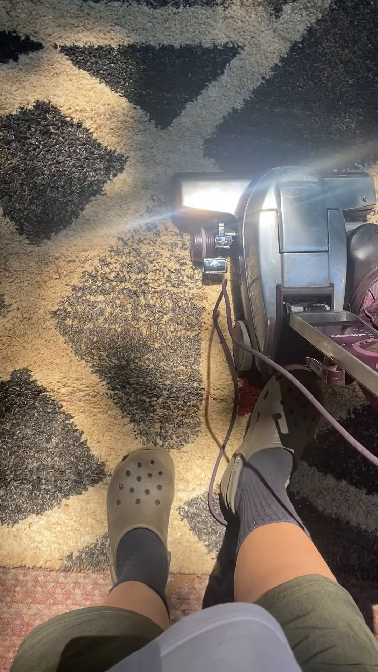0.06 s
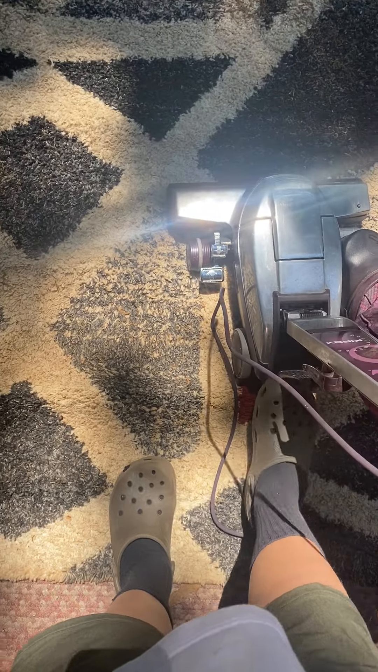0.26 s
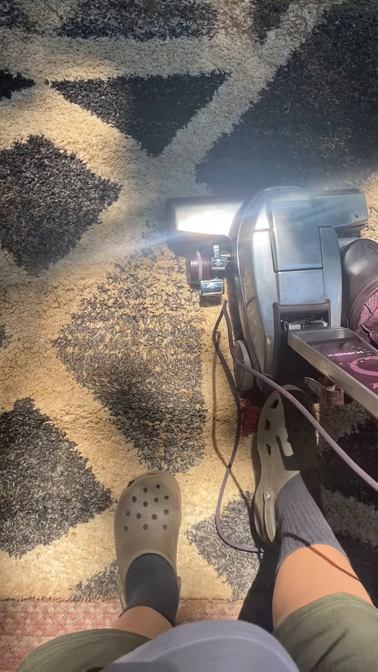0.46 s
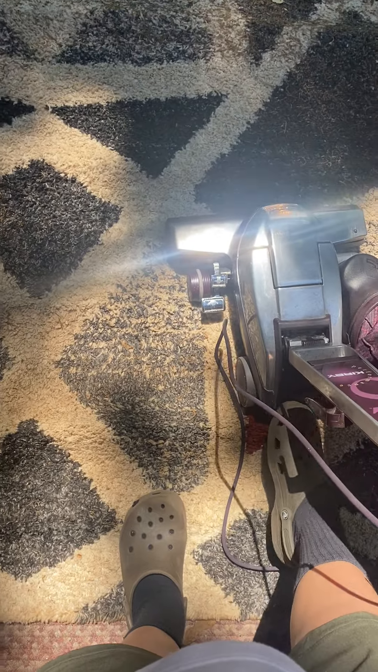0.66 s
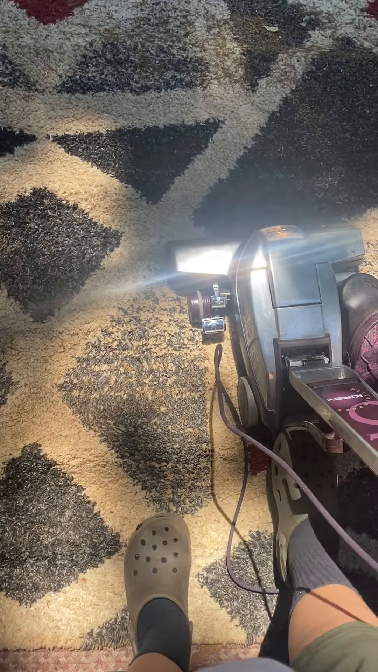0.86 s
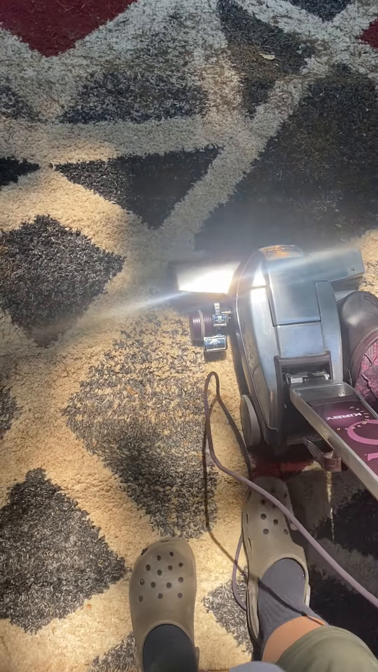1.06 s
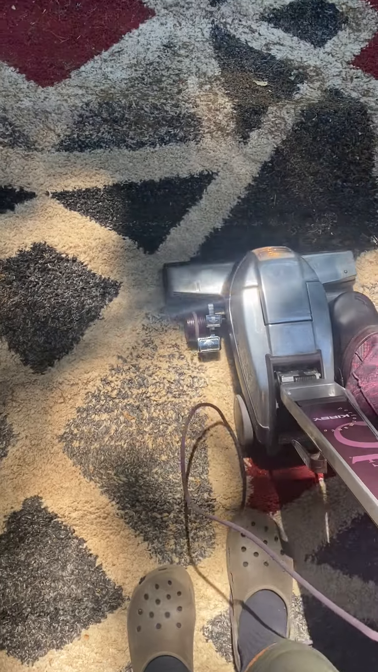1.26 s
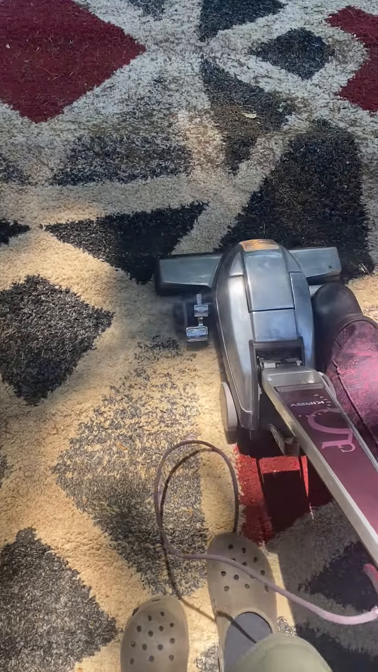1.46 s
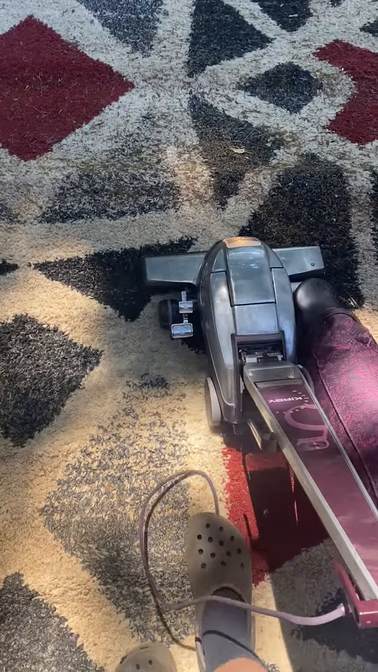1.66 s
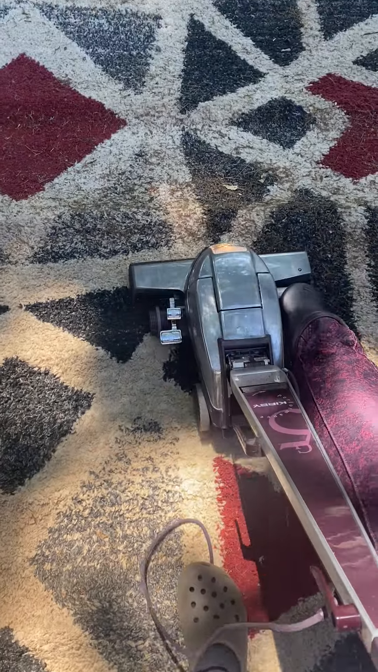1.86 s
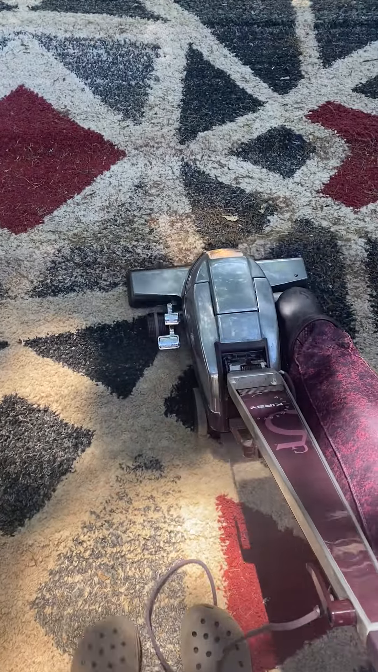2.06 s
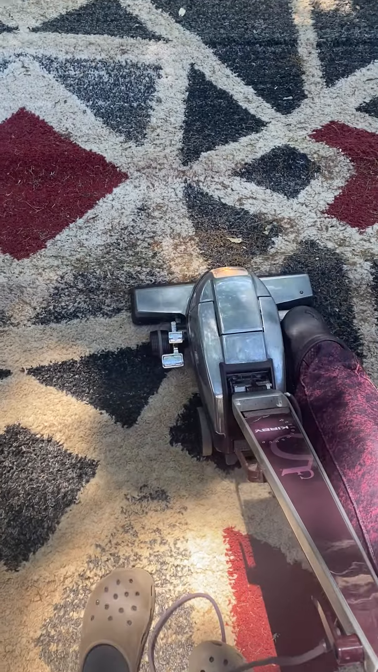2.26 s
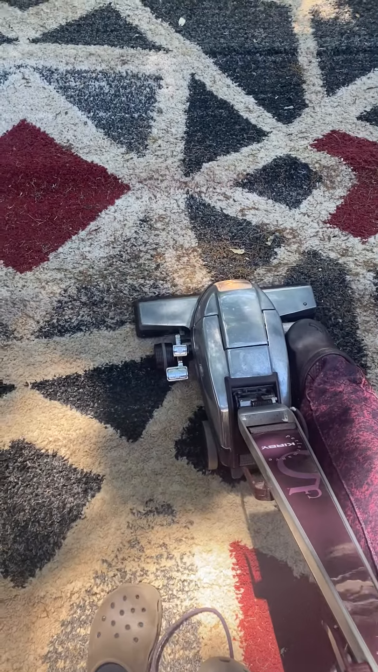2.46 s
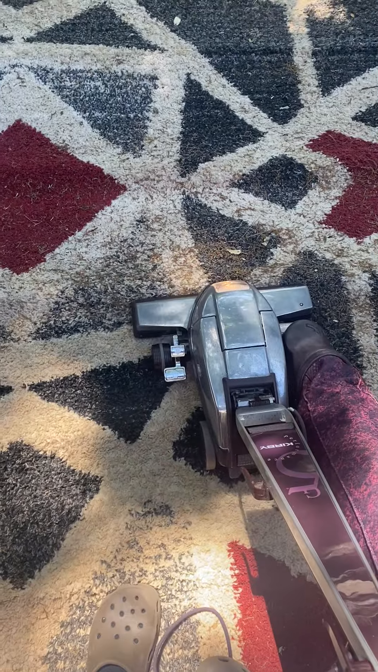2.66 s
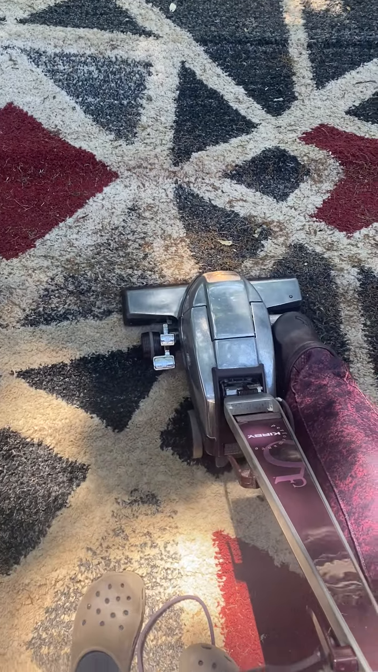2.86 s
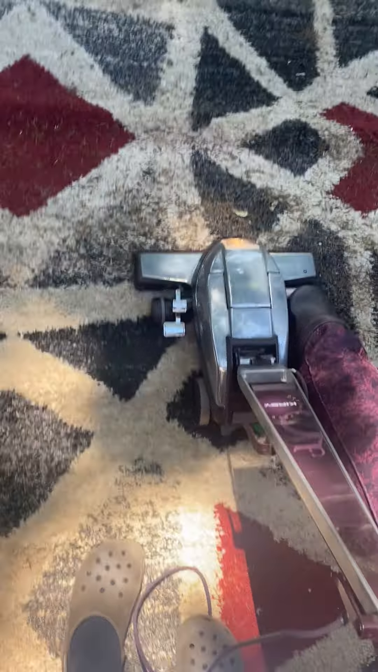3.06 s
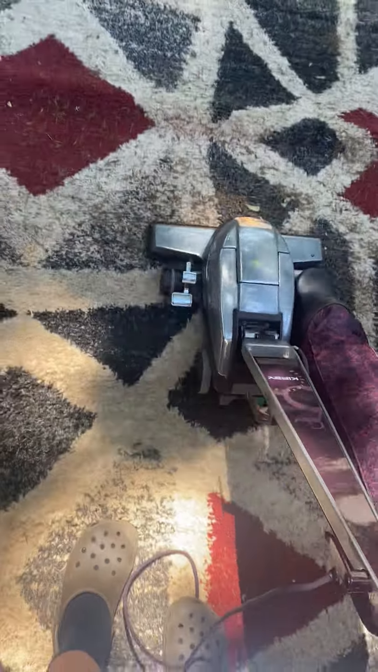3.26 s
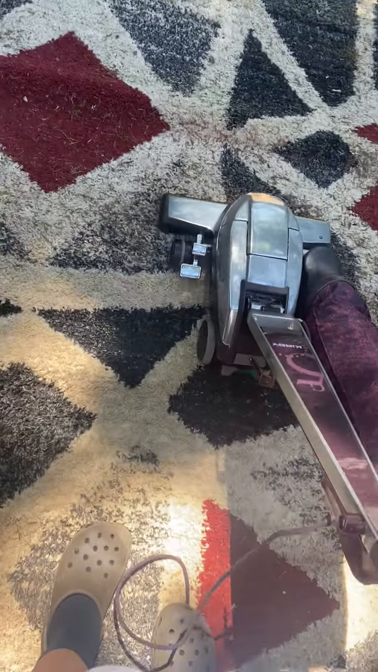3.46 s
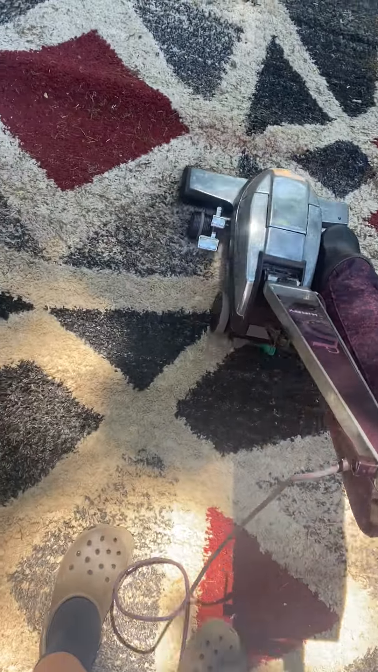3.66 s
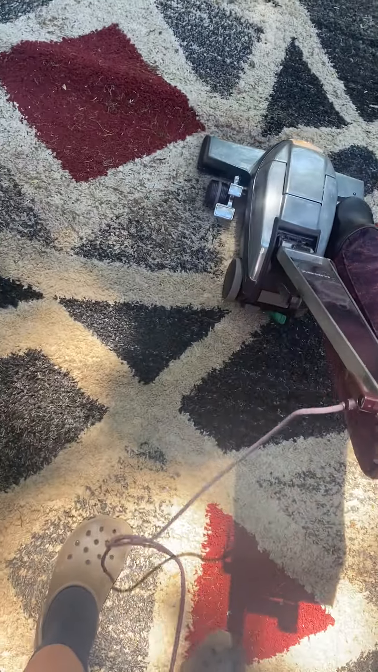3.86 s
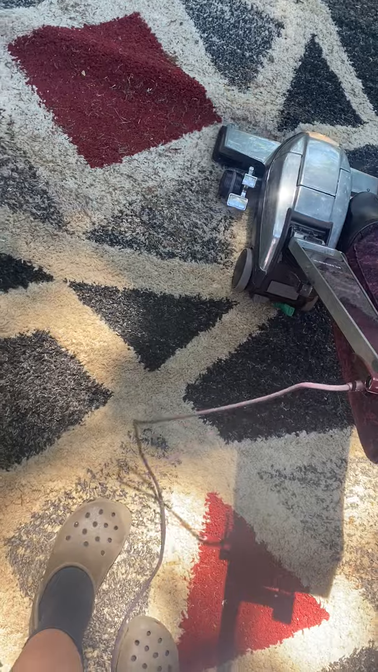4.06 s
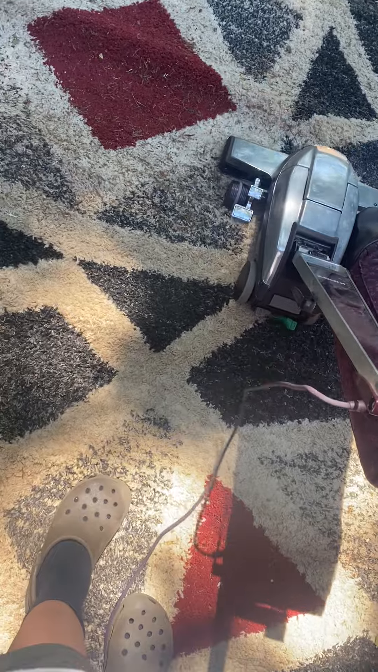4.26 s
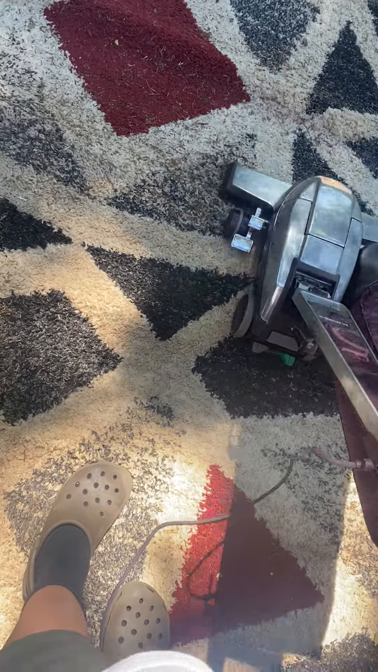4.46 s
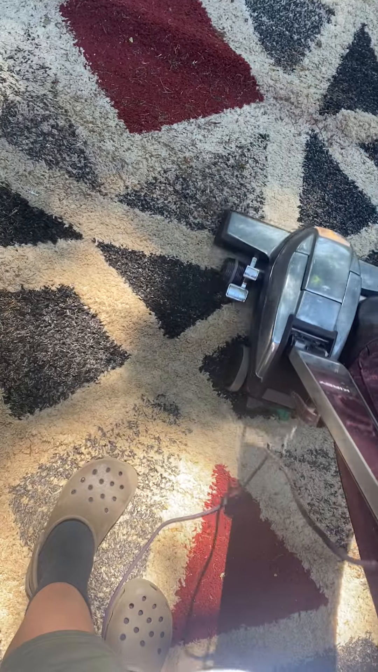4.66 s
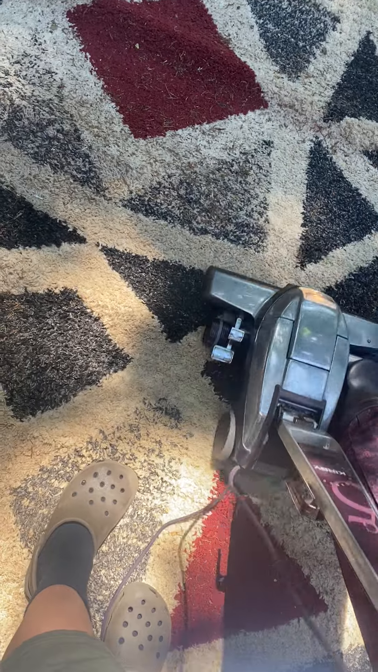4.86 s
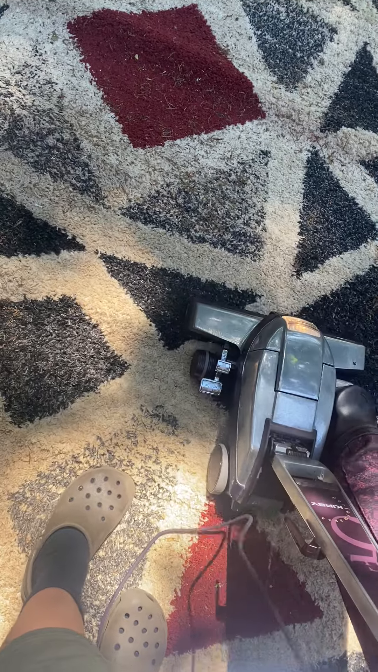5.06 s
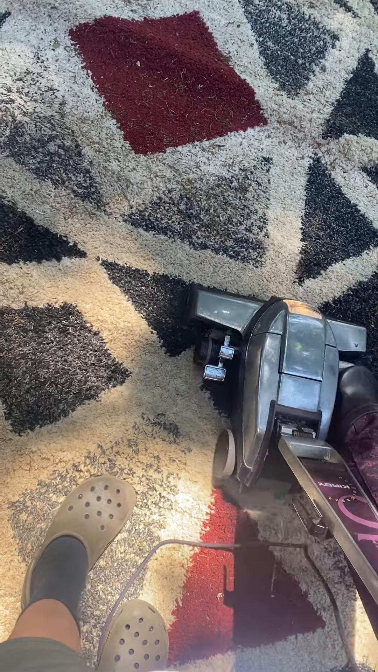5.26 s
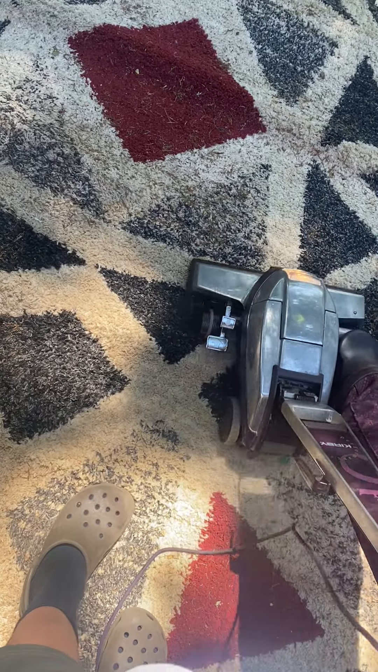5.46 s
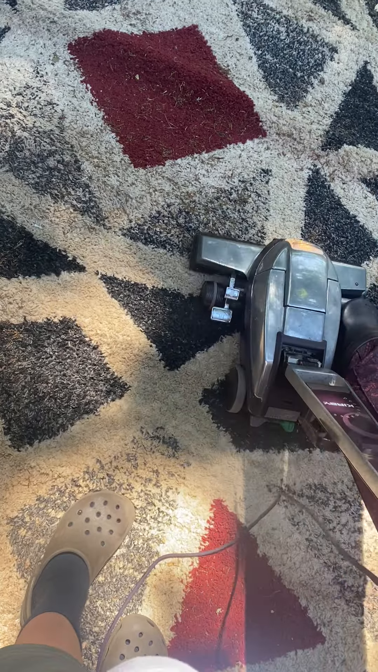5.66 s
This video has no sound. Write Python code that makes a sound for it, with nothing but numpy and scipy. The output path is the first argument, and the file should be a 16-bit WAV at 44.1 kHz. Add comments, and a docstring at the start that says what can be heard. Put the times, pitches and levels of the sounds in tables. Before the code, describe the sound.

Faint, low open air lies under the start. From about 0.1 s a foot works a plastic pedal: a few small dry clacks, then a sharper, ringing one near 0.4 s and the loudest switch snap at 0.55 s. The motor catches at once, growling and sweeping up in pitch until about 1.2 s, then runs with a high fan whine, broad airy roar and hiss, and a low buzzing brush hum near 200 Hz. Grit ticks appear from 1.5 s; bristles scratch faintly around 2 to 2.6 s. A short breathy whistle flickers near 2.9 to 3.2 s. Thuds and sharp clicks cluster at 3.3 to 3.5 s. Suction gulps dip throatily from 3.0 s, most densely at 4.4 to 4.75 s, as the motor sags slightly; a bump lands at 4.7 s. The hiss brightens around 4 to 4.8 s, then dulls. It is still running when it ends at about 5.7 s. Close, dry stereo from above.

```python
"""A foot clacks the pedal and switch of an upright vacuum cleaner on a rug in the open air; the motor spins up and runs.
Clacks are decaying noise with housing modes; the fan whines in tones locked to its shaft, over coloured air noise.
The belt-driven brush roll hums in orders of its turning and slows as it bites the pile.
The nozzle bumps and gulps, and grit ticks up it in short bursts, over the faint air of the yard.
Heard from above by a pair of closely spaced microphone ports."""
import sys
import numpy as np
from scipy import signal
from scipy.fft import rfft, irfft
from scipy.io import wavfile

SR = 44100
rng = np.random.default_rng(int(sys.argv[2]) if len(sys.argv) > 2 else 0)


def digitize_waveform(pressure):
    """Quantize a signal to 16-bit integers and store it at the path in sys.argv[1].

    Rows of a 2-D input are taken as channels; values are limited to [-1, 1].
    """
    field = np.atleast_2d(pressure).T
    bounded = np.clip(field, -1, 1)
    quanta = np.round(bounded * 32767).astype(np.int16)
    wavfile.write(sys.argv[1], SR, quanta)


N = 251811
T = np.arange(N) / SR  # s
HZ = np.fft.rfftfreq(N, 1 / SR)

# Air of the yard. Each row: frequency in Hz, relative density in dB per Hz.
YARD_SPECTRUM = [(20, -18), (55, 1.5), (120, 3), (200, -8), (500, -15.5), (1200, -23.5), (3000, -27.5),
                 (6000, -40), (15000, -52)]
YARD_SWAY_DB = .8

# The port pair, by frequency. Each row: frequency in Hz, phase by which the left leads in radians.
PORT_LEAD = [(90, 0), (400, -.18), (780, -.4), (1100, 0), (1900, 0), (2500, .55), (4300, .75), (5100, .15),
             (6000, 1.4), (7300, 3.14), (9500, 5.5), (9900, 6.2), (11000, 6.5), (13500, 9.4), (14400, 9.7),
             (15900, 12.3)]
# Each row: frequency in Hz, left minus right in dB.
PORT_TILT = [(110, 0), (200, -1), (380, -2), (620, -3.2), (1100, -1), (2300, -2.5), (4400, -1.3), (8000, 0)]
# Each row: frequency in Hz, likeness of the two ports (1 is identical, no unit).
PORT_LIKENESS = [(60, 1), (250, .998), (600, .98), (1700, .98), (3100, .85), (4200, .92), (6000, .88),
                 (7300, .97), (8500, .86), (10300, .96), (12000, .78), (13700, .97), (15000, .7)]
EDGE_HZ = 15850  # upper band limit of the recorder

# Pedal and switch. Each row: start in seconds, level before its envelope in dB, treble against middle in dB,
# decay by 60 dB in seconds, ring of the housing against the clack in dB, tilt of that ring in dB per octave.
CLACKS = [(.0805, -47, -15, .02, -2, -6), (.1008, -41, -3, .02, 0, 0), (.1028, -37, 0, .045, 3, -2),
          (.1318, -39.5, -8, .03, 0, -2), (.354, -51, -10, .045, -6, -3), (.381, -47, -10, .08, -4, 0),
          (.3989, -30, 9, .016, 12.5, 0), (.4303, -40, -3, .018, 0, 0), (.5486, -23, 2, .02, 0, -1),
          (.5537, -28, -4, .025, 1, -4)]
CLACK_RISE_S = .0006
# Colour of the clacking plastic. Each row: frequency in Hz, relative density in dB per Hz.
PLASTIC_SPECTRUM = [(100, -32), (330, -3), (600, 3), (1000, 10), (1500, -1), (2300, 2), (3000, -7),
                    (4000, -6), (4700, -3), (6500, -13), (8500, -13), (10000, -15), (15500, -15)]
# Modes of the housing. Each row: frequency in Hz, relative level in dB, decay by 60 dB in seconds.
HOUSING_MODES = [(305, -35, .18), (357, -32, .28), (980, -21, .04), (1990, -19, .035), (2250, 0, .013),
                 (2450, -17, .04), (3230, -25, .04), (4800, -18, .018), (5500, -22, .016)]

# Grit striking the nozzle. Each row: start in seconds, level before its envelope in dB,
# decay by 60 dB in seconds, ring against the tick in dB, tilt of that ring in dB per octave.
GRIT_STRIKES = [(1.5076, -24, .007, -3, 4), (1.8654, -24, .007, -10, 4), (1.9013, -20, .007, -15, 4),
                (1.9397, -23, .007, -8, 4), (2.2352, -25, .007, -12, 4), (2.4045, -26, .007, -10, 4),
                (3.367, -8.5, .0035, -14, 10), (3.3915, -25, .008, -12, 4), (3.439, -27, .007, -10, 4),
                (3.454, -26, .007, -12, 4), (3.4985, -20, .012, -14, 0), (3.5026, -22, .014, 4, -1),
                (3.5045, -21, .012, 5, -2), (3.5084, -38, .01, 19, -10), (3.5224, -28, .006, 4, 16),
                (3.5294, -9.5, .006, -.5, 2), (3.5318, -25, .008, 3, 3), (3.5684, -24, .007, -10, 4),
                (3.6902, -24, .007, -7, 4)]
# Colour of a tick. Each row: frequency in Hz, relative density in dB per Hz.
TICK_SPECTRUM = [(2000, -40), (6000, -7), (9000, 0.5), (10500, 0.5), (12500, -2), (15500, -0.5)]
# Modes of the nozzle. Each row: frequency in Hz, relative level in dB, decay by 60 dB in seconds.
NOZZLE_MODES = [(2000, -5, .018), (2450, -2, .014), (2800, -3, .012), (5200, -8, .008), (6300, -9, .007)]

# The nozzle bumps and grabs the pile. Each row: start in seconds, level before its envelope in dB,
# decay by 60 dB in seconds.
BUMPS = [(1.278, -27, 0.045), (3.297, -13, 0.083), (3.453, -6.5, 0.051), (3.506, -10.5, 0.11),
         (4.695, -9.5, 0.044)]
# Colour of a bump. Each row: frequency in Hz, relative density in dB per Hz.
THUD_SPECTRUM = [(100, -25), (300, -2), (400, 4), (550, -1), (750, -16), (1500, -34), (3000, -60)]
# Suction gulps as the nozzle seals on the rug and lets go. Each row: start in seconds, length in seconds,
# start frequency in Hz, end frequency in Hz, level in dB.
GULPS = [(3.04, 0.034, 545, 510, -20.5), (3.137, 0.024, 420, 405, -20), (3.288, 0.048, 410, 393, -21),
         (3.687, 0.024, 523, 492.5, -22), (4.029, 0.042, 530, 469.7, -21.5), (4.41, 0.02, 501, 430, -20.5),
         (4.452, 0.039, 499, 338, -17.5), (4.509, 0.02, 450, 400, -31), (4.575, 0.017, 420, 377, -17.5),
         (4.595, 0.067, 385, 380, -20), (4.743, 0.024, 437.6, 394, -20)]
# Air sings in the gap under the nozzle as the push begins. Each row: time in seconds, frequency in Hz, level in dB.
GAP_TONE = [(2.8, 2096, -80), (2.87, 2094, -44), (2.885, 2050, -27.5), (2.93, 2034, -32),
            (2.975, 2200, -41), (2.995, 2192, -29), (3.066, 2170, -44), (3.135, 2190, -26.5),
            (3.22, 2217, -43), (3.45, 2220, -80)]

# Bristles scratching the pile. Each row: time in seconds, level in dB.
SCRUB_LEVEL = [(.8, -70), (1.7, -51), (1.95, -35.5), (2.3, -34), (2.6, -40), (2.9, -48), (5.7, -57)]
# Colour of the scratching. Each row: frequency in Hz, relative density in dB per Hz.
BRISTLE_SPECTRUM = [(500, -22), (950, 7), (1100, -5), (1500, -2), (1900, -23), (4000, -49)]
# Speed the brush roll settles at as the pile drags on it, before the spin-up; two rows to a turn.
# Each row: time in seconds, bristle rows striking per second.
ROW_RATE = [(.7, 233), (1.05, 204), (1.48, 208), (2.03, 218), (2.5, 204), (2.85, 199.5), (3.2, 207),
            (3.33, 198), (3.41, 227), (3.6, 211), (3.9, 211), (4.1, 203), (4.46, 198), (4.5, 223),
            (4.54, 194), (4.62, 220), (4.8, 215), (5.1, 192), (5.5, 217)]
# Bristle hum, before a small lift. Each row: time in seconds, level in dB.
HUM_LEVEL = [(.66, -38), (.83, -20), (1.35, -24.5), (1.45, -29.5), (1.58, -23), (1.85, -30), (2.1, -23),
             (2.95, -21.5), (3.3, -28), (3.45, -25.5), (4.05, -23.5), (4.32, -26), (4.37, -33),
             (4.485, -51), (4.505, -19.5), (4.56, -25.5), (4.62, -34.5), (4.73, -34), (4.9, -26),
             (5.11, -21.5), (5.23, -27), (5.71, -28)]
# Once-a-turn wobble of the roll, before a small lift. Each row: time in seconds, level in dB.
WOBBLE_LEVEL = [(0.66, -44), (0.78, -51), (0.88, -33), (1.08, -25.5), (1.25, -36), (1.33, -28.5),
                (1.75, -38), (2.12, -29.5), (2.3, -46), (3.03, -32.5), (3.27, -44), (3.3, -34.5),
                (3.42, -53), (3.47, -34.5), (3.87, -44), (4.01, -31.5), (4.25, -40.5), (4.39, -30.5),
                (4.45, -49), (4.53, -36.5), (4.72, -54), (4.81, -31), (4.94, -30.5), (5.04, -43),
                (5.08, -32), (5.43, -32.5), (5.47, -42), (5.56, -28.5), (5.66, -34), (5.7, -44)]
# Fourth order of the roll, a drone that swells where the bristles dig in. Each row: time in seconds, level in dB.
DRONE_LEVEL = [(.66, -30), (.9, -31.5), (1.5, -30), (2.3, -34), (2.48, -34), (2.62, -23), (2.8, -43),
               (2.95, -29), (3.03, -24), (3.15, -35), (3.23, -29), (3.5, -32), (4, -34.5), (4.4, -56),
               (4.8, -30), (5, -29), (5.71, -44)]
# Higher orders of the roll, coming and going as a rattle. Each row: order (multiple of the turning), mean level in dB.
RATTLE_ORDERS = [(6, -44), (8, -47.5)]
# The third order buzzes harder the more freely the roll spins, and shudders once on the way up to speed.
BUZZ_DB, BUZZ_DB_PER_HZ = -35, .5
SHUDDER_S, SHUDDER_WIDTH_S, SHUDDER_DB = 0.98, 0.23, 12.5

SWITCH_S, SPIN_UP_S = .549, .195  # switch closes; time constant of the motor
MAINS_RIPPLE_HZ = 120
# Speed the motor settles at under the changing load, before the spin-up.
# Each row: time in seconds, turns per second.
MOTOR_SPEED = [(.9, 387), (1.1, 383), (1.3, 385.3), (1.6, 387), (1.75, 389), (1.9, 392), (2.15, 394.2),
               (2.5, 391), (3, 385), (3.35, 383.8), (3.55, 390), (3.9, 388.8), (4.1, 382), (4.4, 374),
               (4.52, 378.2), (4.63, 376), (4.75, 380.5), (5.1, 381.4), (5.3, 385), (5.57, 393.6)]
# The windings growl on the starting current. Each row: multiple of the mains ripple, level in dB.
INRUSH_TONES = [(2, -54), (3, -36), (4, -56)]
INRUSH_T60_S = 0.89
# A bearing sings while the machine is pushed out to the side. Each row: time in seconds, level in dB.
BEARING_LEVEL = [(3.6, -75), (3.95, -46), (4.1, -45), (4.4, -44), (4.77, -43.5), (5.05, -77)]
# Its whistles. Each row: harmonic of the ball-pass rate, mean level against the bearing in dB.
BEARING_WHISTLES = [(1, -3.5), (2, 3.5), (3, 1), (4, -16)]
BALL_PASSES_PER_TURN = 3.27
# Blade whine and its mains-ripple sidebands, each fading on its own as the machine moves; the ducts colour them later.
# Each row: time in seconds, blade tone in dB, lower sideband in dB, upper sideband in dB.
WHINE_LEVELS = [(.68, -46.5, -55, -53), (.8, -41, -52, -50), (.9, -42, -54, -47), (1.08, -46, -41, -54),
                (1.18, -46.5, -47.5, -47), (1.3, -45, -52, -43), (1.6, -43, -46, -47),
                (1.9, -44.5, -47, -64), (2.2, -40.5, -46, -60), (2.65, -43.5, -62, -61),
                (3.08, -42.5, -45, -39.5), (3.35, -38.5, -44, -58), (3.5, -42.5, -48, -58),
                (3.8, -40, -45, -56), (4.1, -40.5, -51, -54), (4.4, -36.5, -48, -49),
                (4.8, -38.5, -51, -45), (5, -52, -56, -48), (5.3, -51, -60, -47), (5.62, -41.5, -48, -51)]
# How the ducts favour the high motor tones. Each row: frequency in Hz, gain in dB.
DUCT_GAIN = [(400, 3), (1000, 7), (1350, -8), (1540, 9), (1660, 18), (1850, 20), (2120, 17), (2260, 3),
             (2480, 0), (2750, -9), (2980, -4), (3120, 3), (3300, -9), (3480, -8), (3600, -2), (3700, -5),
             (3860, 0), (4500, 0), (5000, 10), (6000, -13), (9400, 0)]
# Sixth order of the shaft. Each row: time in seconds, level in dB.
SIXTH_LEVEL = [(.7, -70), (1, -44), (1.3, -37.5), (1.7, -39), (2.6, -42.5), (3.1, -36), (3.4, -36),
               (3.8, -38), (4.1, -38.5), (4.55, -49), (4.85, -38.5), (5.1, -40), (5.6, -34)]
# Thin tone above the blade whine. Each row: time in seconds, level in dB.
OVERTONE_LEVEL = [(.9, -75), (1.3, -50), (2.6, -54), (3.1, -48), (3.7, -49), (4.2, -62), (5, -57),
                  (5.7, -54)]
THIRTEENTH_DB = -55.5  # thirteenth shaft order at full speed
OCTAVE_DB = -41  # blade octave, before its run-up envelope

# Colours of the four air layers. Each row: frequency in Hz, relative density in dB per Hz.
ROAR_SPECTRUM = [(25, -34), (50, -19.5), (100, -18), (160, -6.5), (240, -6), (310, -2), (400, -0.5),
                 (540, -1.5), (680, -14), (810, -9.5), (1050, -16.5), (1350, -20), (2000, -61), (4000, -80)]
RUSH_SPECTRUM = [(300, -48), (900, -7), (1300, -11), (1550, 0), (1750, -1.5), (2000, 2.5), (2280, 1),
                 (2600, -3.5), (2900, -14.5), (4000, -53), (9000, -80)]
HISS_SPECTRUM = [(1200, -5), (2600, -0.5), (3300, 6.5), (4200, 4.5), (4550, 1.5), (4900, 5.5), (5400, 4.5),
                 (5900, 1), (6600, 2), (7100, -12), (7700, -88), (9500, -5), (16000, -48)]
SPRAY_SPECTRUM = [(3000, -50), (6500, -106), (7800, 5), (8600, 13), (9500, 6), (9900, 5.5), (11500, 5.5),
                  (13500, 0.5), (15700, 2)]
# How each air layer follows the machine. The one row: level at full speed in dB, drop at standstill in dB,
# steepness of that rise (no unit), share of the surge (no unit), rise when swung away in dB.
ROAR_LAW = (-22.5, 41, 2, 1.08, -1.5)
RUSH_LAW = (-30.5, 18.5, 2, 0.47, -0.5)
HISS_LAW = (-38, 39, 3.5, 1.7, 3.5)
SPRAY_LAW = (-43.5, 47, 2.5, 0.45, 3)
# Air surging as the nozzle is pushed and drawn back. Each row: time in seconds, surge in dB before a layer's share.
STROKE_SURGE = [(.9, 0.5), (1.25, 1.2), (1.9, 2), (2.3, 0), (2.85, -0.5), (3.02, 2), (3.15, 0),
                (3.25, -0.5), (3.5, 0), (3.85, 0.2), (4.35, 0), (4.55, 1), (5.05, 1.5), (5.71, 1)]
# The nozzle riding over the pile. Each row: time in seconds, roar in dB, rush in dB, hiss in dB.
PILE_RIDE = [(.8, 0, 0.5, 0.5), (1.35, 0, 0.5, 0), (1.8, -0.5, -1, -1), (2.3, -2, -0.5, 2),
             (2.8, 0.5, 0, 2.5), (2.98, -3, 0, 0.5), (3.13, 0, 2, 1.5), (3.3, 1, 0.5, 1), (3.55, 0, 1, 0),
             (3.9, -0.5, -1, -2), (4.3, -.5, -1, 0.5), (4.75, 0.5, 0, -0.5), (5.05, -1, -1.5, 0.5),
             (5.71, -0.5, 0, 2)]
# How far the body has swung away to the side. Each row: time in seconds, share of the full swing (no unit).
BODY_SWING = [(2.85, -0.5), (3.1, 0.5), (3.35, 0.1), (3.8, 0.74), (4.1, 1), (4.82, 1), (5.02, -1),
              (5.5, -0.5)]
# Colour of the air noise at full swing. Each row: frequency in Hz, gain in dB.
SWUNG_GAIN = [(200, 0.5), (400, 1.5), (700, -2), (1100, 2.5), (1400, -0.5), (2000, -0.5), (2550, 2.5),
              (3100, -2), (4500, 1), (5400, -3), (6300, -1), (7100, -3.5), (8600, -1), (9500, 0),
              (12000, 0), (15000, 1)]


def amp(db):
    """Amplitude of a level in dB."""
    return 10 ** (np.asarray(db) / 20)


def unit(x):
    """Scale to an RMS of one."""
    return x / np.sqrt(np.mean(x ** 2) + 1e-20)


def read(points):
    """A frequency table read on a log-frequency axis."""
    f, value = np.transpose(points)
    return np.interp(np.log(HZ + 1), np.log(f + 1), value)


def follow(rows):
    """Every column of a time table, sample by sample."""
    s, *columns = np.transpose(rows)
    return [np.interp(T, s, c) for c in columns]


def colour(x, gain):
    """Filter by a gain given at every frequency in HZ."""
    return irfft(rfft(x) * gain, N)


def noise(spectrum):
    """Noise of unit level with the given colour."""
    return unit(colour(rng.standard_normal(N), amp(read(spectrum))))


def drift(rate_hz):
    """Slow random wander of unit RMS, made on a coarse grid."""
    size = 16384
    lowpass = 1 / (1 + (HZ[:size // 2 + 1] / rate_hz) ** 4)
    slow = irfft(rfft(rng.standard_normal(size)) * lowpass)
    return unit(np.interp(T, np.linspace(0, T[-1], size), slow))


def angle(hz):
    """Running phase in radians of a changing frequency."""
    return 2 * np.pi * np.cumsum(hz) / SR


def burst(s, rise, t60):
    """Envelope of a blow: an exponential rise and decay."""
    age = np.maximum(T - s, 0)
    decay = np.minimum(np.log(1000) * age / t60, 20)
    return (1 - np.exp(-age / rise)) * np.exp(-decay)


def ring(modes, s, rise, tilt_db):
    """Modes struck at time s; a harder blow tilts them upwards, in dB per octave."""
    age = T[:SR // 3]
    middle_hz = np.median([mode[0] for mode in modes])
    sound = np.zeros(len(age))
    for hz, db, t60 in modes:
        level = amp(db + tilt_db * np.log2(hz / middle_hz))
        sound += level * np.exp(-np.log(1000) * age / t60) * np.sin(2 * np.pi * hz * age)
    return np.pad(sound * (1 - np.exp(-age / rise)), (round(s * SR), N))[:N]


def breathy(hz, width_hz):
    """Turbulence in one resonance: a fuzzy whistle of unit level."""
    turn = angle(hz)
    return drift(width_hz / 2) * np.cos(turn) + drift(width_hz / 2) * np.sin(turn)


def powered():
    """Zero until the switch closes, then up within 8 ms."""
    return np.clip((T - SWITCH_S) / .008, 0, 1)


def spin_up():
    """Share of full speed: the motor closes in on it exponentially once switched on."""
    return 1 - np.exp(-np.maximum(T - SWITCH_S, 0) / SPIN_UP_S)


def yard():
    """Faint open air: coloured noise swaying slightly in level."""
    return amp(-53.0 + YARD_SWAY_DB * drift(6.2)) * noise(YARD_SPECTRUM)


def pedal(tail_db=-24, tail_t60=0.24):
    """The dry crack of each plastic clack, with a faint tail from nearby walls."""
    body = noise(PLASTIC_SPECTRUM)
    treble = colour(body, HZ ** 2 / (HZ ** 2 + 3000 ** 2))
    cracks, tail = np.zeros((2, N))
    for s, db, bright_db, t60, _, _ in CLACKS:
        plastic = body + (amp(bright_db) - 1) * treble
        cracks += amp(db) * burst(s, CLACK_RISE_S, t60) * plastic
        tail += amp(db + tail_db) * burst(s, 0.003, tail_t60)
    return cracks + tail * noise(PLASTIC_SPECTRUM)


def housing(rise=0.0008):
    """Every clack rings the modes of the housing."""
    out = np.zeros(N)
    for s, db, _, _, ring_db, tilt_db in CLACKS:
        out += amp(db + ring_db) * ring(HOUSING_MODES, s, rise, tilt_db)
    return out


def grit(dust_per_s=22, dust_db=-46, rise=0.00026):
    """Grains tick on the nozzle and knock its modes by varying amounts; fine dust crackles between them."""
    tick, out = noise(TICK_SPECTRUM), np.zeros(N)
    for s, db, t60, ring_db, tilt_db in GRIT_STRIKES:
        knock = amp(ring_db) * ring(NOZZLE_MODES, s, rise, tilt_db)
        out += amp(db) * (burst(s, rise, t60) * tick + knock)
    # dust begins with the first grain
    hits = (T > GRIT_STRIKES[0][0]) * (rng.random(N) < dust_per_s / SR)
    dust = hits * amp(dust_db + 8.9 * rng.random(N))
    return out + tick * signal.fftconvolve(dust, burst(0, .0003, 0.0098))[:N]


def bumps():
    """Dull thuds of the nozzle against the rug: low noise under decaying envelopes."""
    envelope = sum(amp(db) * burst(s, 0.0038, t60) for s, db, t60 in BUMPS)
    return envelope * noise(THUD_SPECTRUM)


def gulps(rough=0.34):
    """Short throaty suction tones that sink in pitch as the gap closes."""
    out, jitter = np.zeros(N), rough * drift(92)
    for s, length, start_hz, end_hz, db in GULPS:
        share = np.clip((T - s) / length, 0, 1)
        hz = start_hz + (end_hz - start_hz) * share ** 2
        out += np.sqrt(2) * amp(db) * np.sin(np.pi * share) * np.sin(angle(hz) + jitter)
    return out


def leaks(gap_width_hz=170, vent_hz=5420, vent_width_hz=220, vent_db=-47, vent_wander_hz=60):
    """Air sings through the gap under the nozzle, and through a vent as the body swings to the side."""
    (gap_hz, gap_db), (swing,) = follow(GAP_TONE), follow(BODY_SWING)
    wandering_hz = vent_hz + vent_wander_hz * drift(3.6)
    vent = amp(vent_db) * np.maximum(swing, 0) ** 2 * breathy(wandering_hz, vent_width_hz)
    return amp(gap_db) * breathy(gap_hz, gap_width_hz) + vent


def scrub(beat, chop=.4):
    """The bristle rows scratch through the pile: noise chopped at each row."""
    level_db, = follow(SCRUB_LEVEL)
    return amp(level_db) * noise(BRISTLE_SPECTRUM) * (1 + chop * np.cos(beat))


def brush_roll(beat):
    """Bristle rows thump the pile twice a turn; imbalance adds odd orders, and the uneven pile roughens them."""
    (beat_db,), (wobble_db,), (drone_db,) = follow(HUM_LEVEL), follow(WOBBLE_LEVEL), follow(DRONE_LEVEL)
    rate, = follow(ROW_RATE)
    turn, run_up = beat / 2, spin_up() ** 4
    out = amp(beat_db + 0.4) * (1 + 0.11 * drift(24)) * np.sin(beat)
    out += amp(wobble_db + 0.3) * (1 + 0.14 * drift(11.0)) * np.sin(turn + 0.089 * drift(18))
    shudder = np.exp(-((T - SHUDDER_S) / SHUDDER_WIDTH_S) ** 2)
    buzz_db = BUZZ_DB + BUZZ_DB_PER_HZ * (rate - np.median(rate)) + SHUDDER_DB * shudder
    out += run_up * amp(buzz_db) * (1 + 0.23 * drift(23)) * np.sin(3 * turn + 0.14 * drift(51))
    out += amp(drone_db) * (1 + 0.43 * drift(33)) * np.sin(4 * turn + .5 * drift(17))
    # the fifth order follows the hum
    out += amp(beat_db - 11) * (1 + 0.6 * drift(12)) * np.sin(5 * turn + .6 * drift(12))
    for order, db in RATTLE_ORDERS:
        out += run_up * amp(db + 4 * drift(10)) * np.sin(round(order) * turn + .7 * drift(14))
    return np.sqrt(2) * out


def inrush(mains):
    """A rough growl from the windings that dies away as the motor gathers speed."""
    growl = sum(amp(db) * np.sin(round(k) * mains + 0.97 * drift(46)) for k, db in INRUSH_TONES)
    return np.sqrt(2) * burst(SWITCH_S, 0.0075, INRUSH_T60_S) * growl


def bearing(shaft):
    """Harmonics of the ball-pass rate, wavering together as the balls slip."""
    level_db, = follow(BEARING_LEVEL)
    passes = BALL_PASSES_PER_TURN * shaft + .36 * drift(20)
    out = np.zeros(N)
    for k, db in BEARING_WHISTLES:
        out += amp(level_db + db + 3.5 * drift(14)) * np.sin(round(k) * passes + 0.5 * drift(45))
    return out


def fan(mains, waver=0.16, outer_db=-52, flutter_depth_db=1.0):
    """Eleven blades whine, with sidebands from the mains ripple; weaker tones ride on the same shaft."""
    (speed,), (sixth_db,), (overtone_db,) = follow(MOTOR_SPEED), follow(SIXTH_LEVEL), follow(OVERTONE_LEVEL)
    blade, lower, upper = amp(follow(WHINE_LEVELS))
    pace = spin_up()
    shaft = angle(speed * pace)
    # the flow over the blades is ragged, and rich in their octave, until the fan is up to speed
    stall = 1 - pace ** 6
    ragged = waver * drift(30) + .75 * stall * drift(110)
    flutter_db = (flutter_depth_db + 1.5 * stall) * drift(24)
    tone = 11 * shaft + ragged
    sidebands = lower * np.sin(tone - mains + .3 * drift(25))
    sidebands += upper * np.sin(tone + mains + .3 * drift(25))
    sidebands += amp(outer_db - 4 + 3 * drift(10)) * np.sin(tone + 2 * mains + .4 * drift(25))
    whine = amp(flutter_db) * (blade * np.sin(tone) + amp(1.2 * drift(14)) * sidebands)
    commutator = 24 * shaft + 2 * ragged
    whine += amp(-58 + 3 * drift(30)) * np.sin(commutator)
    out = colour(whine * powered(), amp(read(DUCT_GAIN)))
    out += amp(OCTAVE_DB + flutter_db) * pace * (1 - pace) * np.sin(2 * tone)
    out += amp(sixth_db + 0.59 * drift(28)) * np.sin(6 * shaft + waver * drift(25))
    out += pace ** 2 * amp(-34.0 + 2.6 * drift(11)) * np.sin(shaft + waver * drift(28))
    out += amp(overtone_db + 1.7 * drift(8.8)) * np.sin(12.49 * shaft + waver * drift(30))
    out += amp(THIRTEENTH_DB + 3 * drift(8)) * pace ** 30 * np.sin(13 * shaft + .6 * drift(30))
    return np.sqrt(2) * (out + bearing(shaft))


def air_db(full_db, standstill_drop_db, steepness, surge_share, swing_db):
    """Level of an air layer: it rises with the motor, surges with the strokes and changes as the body swings."""
    (surge_db,), (swing,) = follow(STROKE_SURGE), follow(BODY_SWING)
    drop_db = standstill_drop_db * (1 - spin_up()) ** steepness
    return full_db - drop_db + surge_share * surge_db + swing_db * swing


def swung(air):
    """The air noise changes colour as the vents turn away."""
    swing, = follow(BODY_SWING)
    return air + swing * colour(air, amp(read(SWUNG_GAIN)) - 1)


def airflow(beat, mains):
    """Turbulence in nozzle, fan and exhaust, chopped a little by the bristles and the pulsing torque."""
    roar_ride_db, rush_ride_db, hiss_ride_db = follow(PILE_RIDE)
    flutter = drift(29)  # shared by roar and rush
    roar_db = air_db(*ROAR_LAW) + roar_ride_db + 0.47 * flutter
    rush_db = air_db(*RUSH_LAW) + rush_ride_db + .5 * flutter + 1.0 * drift(20)
    hiss_db = air_db(*HISS_LAW) + hiss_ride_db + 0.94 * drift(28)
    spray_db = air_db(*SPRAY_LAW) + 1.14 * drift(34)
    roar = amp(roar_db) * noise(ROAR_SPECTRUM) * (1 + 0.047 * np.cos(beat / 2))
    rush = amp(rush_db) * noise(RUSH_SPECTRUM) * (1 + 0.028 * np.cos(mains))
    hiss = amp(hiss_db) * noise(HISS_SPECTRUM) * (1 + 0.012 * np.cos(mains))
    spray = amp(spray_db) * noise(SPRAY_SPECTRUM) * (1 + 0.11 * np.cos(mains))
    return roar + rush + hiss + spray


def ports(direct, diffuse):
    """Two ports hear the direct sound with a phase lead; diffuse sound differs between them."""
    size = 1024
    alike = read(PORT_LIKENESS)
    # half the difference goes to each port
    lean = amp(read(PORT_TILT) / 2) * np.exp(1j * read(PORT_LEAD) / 2)
    shared = np.sqrt((1 + alike) / 2) * np.array([lean, 1 / lean])
    apart = np.sqrt((1 - alike) / 2) * np.array([lean, -1 / lean])
    pair = np.zeros((2, N))
    for sound, response in (direct, shared), (diffuse, apart):
        taps = np.roll(irfft(response, N), size, axis=1)[:, :2 * size]
        pair += signal.oaconvolve(sound[None], taps, axes=1)[:, size:size + N]
    return pair


def scene():
    """The machine over the faint air of the yard."""
    beat = angle(follow(ROW_RATE)[0] * spin_up())
    mains = 2 * np.pi * MAINS_RIPPLE_HZ * T
    brush_fade = np.clip((T - .6) / 0.18, 0, 1)
    air, diffuse_air = (powered() * swung(airflow(beat, mains)) for _ in range(2))
    motor = powered() * (fan(mains) + inrush(mains))
    suction = powered() * (bumps() + gulps() + leaks())
    brush = brush_fade * (brush_roll(beat) + scrub(beat))
    direct = yard() + pedal() + housing() + grit() + suction + brush + motor + air
    diffuse = yard() + pedal() + diffuse_air
    return ports(direct, diffuse)


def record(dry):
    """The recorder's wind filter and band limit."""
    lean = signal.sosfilt(signal.butter(4, 44, "high", fs=SR, output="sos"), dry)
    band = signal.firwin(511, EDGE_HZ, window=("kaiser", 9), fs=SR)
    return signal.oaconvolve(lean, band[None], "same")


dry = scene()
out = record(dry)
digitize_waveform(out)
```